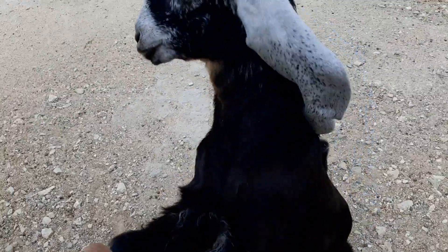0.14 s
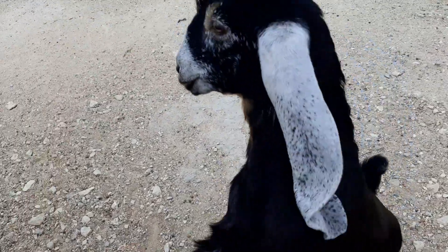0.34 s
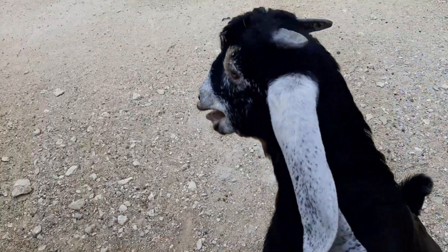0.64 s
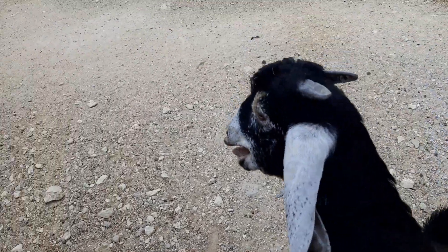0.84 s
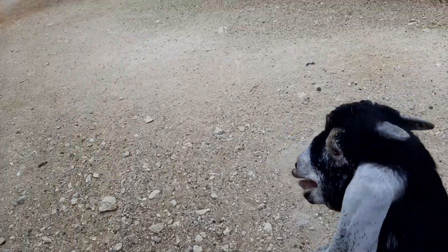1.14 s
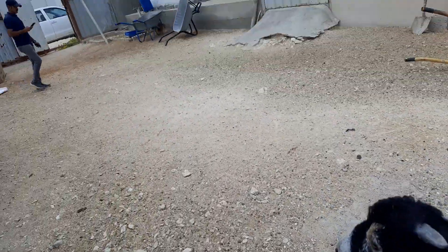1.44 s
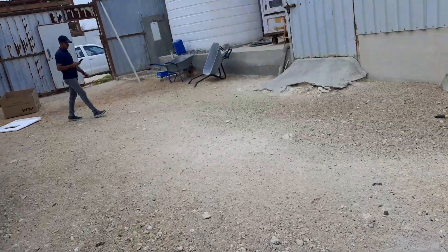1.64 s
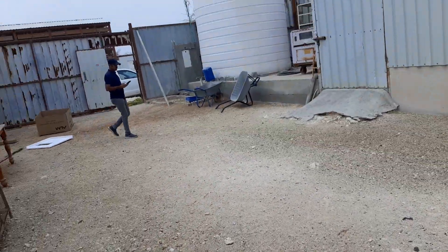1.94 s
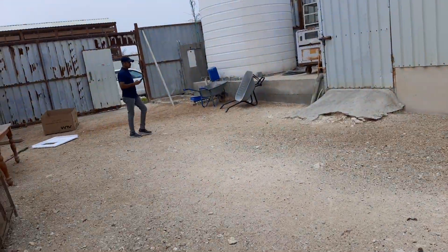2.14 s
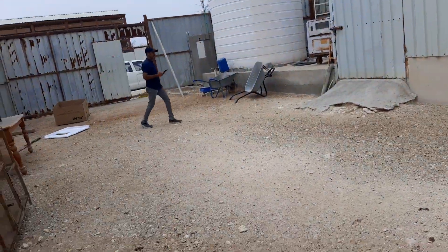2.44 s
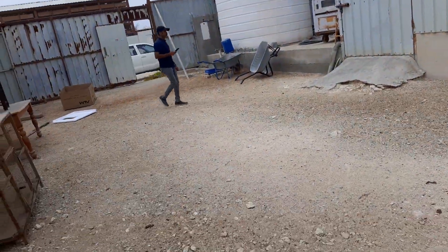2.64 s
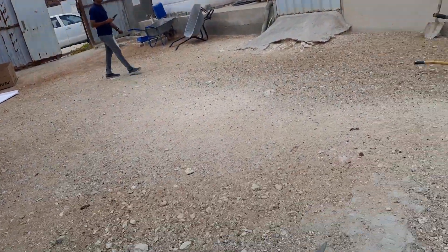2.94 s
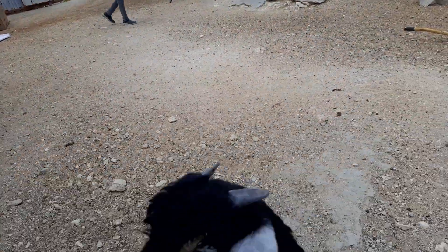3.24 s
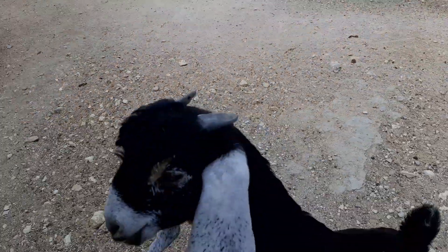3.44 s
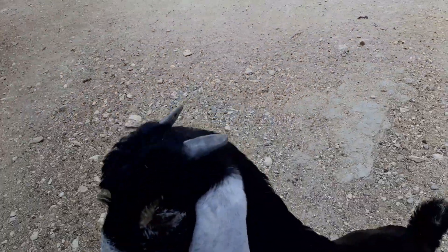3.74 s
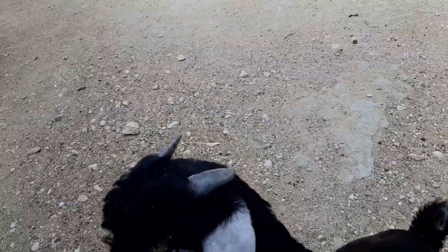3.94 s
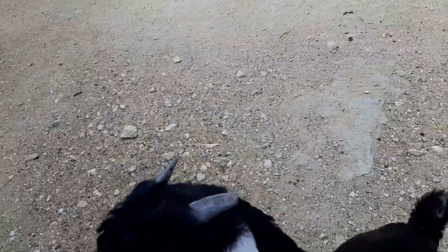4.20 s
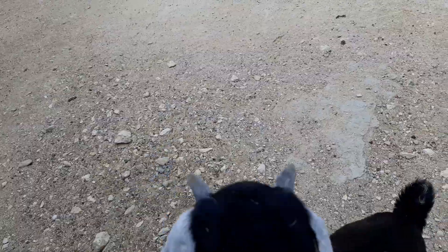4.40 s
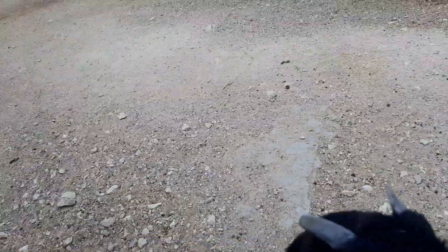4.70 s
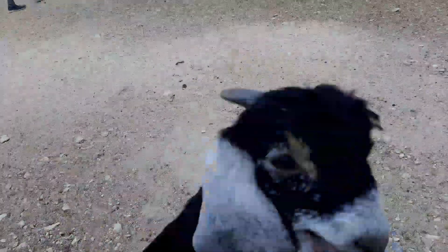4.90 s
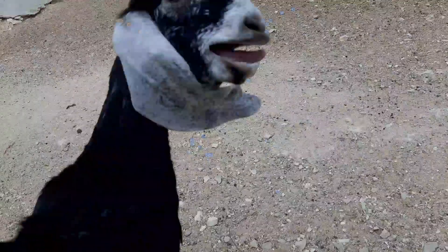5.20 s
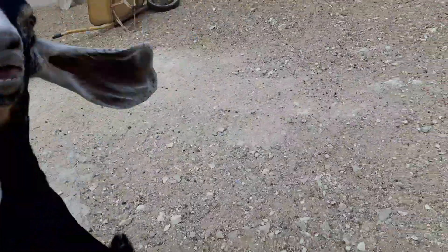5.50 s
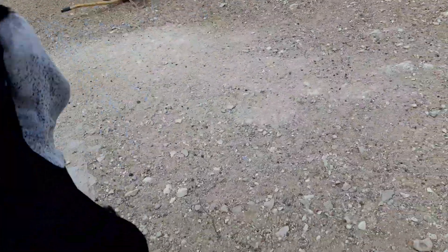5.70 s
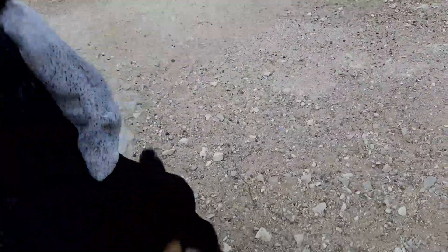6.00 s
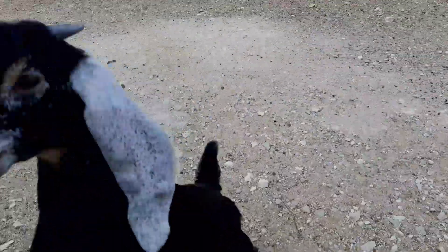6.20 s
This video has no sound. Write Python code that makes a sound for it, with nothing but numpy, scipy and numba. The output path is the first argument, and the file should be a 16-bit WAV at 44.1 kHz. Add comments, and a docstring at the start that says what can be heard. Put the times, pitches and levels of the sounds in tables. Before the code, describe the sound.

Outdoors, close stereo microphone: a low lumpy breeze at first, then three strong goat bleats, each about a second long with a gap between. The voice is reedy and nasal, fluttering about a dozen times a second, its tone shifting as the mouth opens and the tongue comes out. Short, faint reflections surround it. Afterwards only quiet air, soft hoof scuffs and dry grit remain.

```python
"""A breeze buffets the microphone ports over soft open-air hiss and a thin, far-off whine.
Then a goat bleats three times, close by, in an open gravel yard: each bleat starts through the nose, opens into
a bright tone of vocal-fold pulses shaped by mouth resonances, and quavers about eleven times a second.
Sheds send back faint echoes as delayed copies, and the yard scatters the rest as a decaying noise tail.
After the last bleat come dull hoof scuffs and dry ticks of grit, both bursts of filtered noise."""
import sys
import numpy as np
from scipy import signal
from scipy.fft import rfft, irfft, next_fast_len
from scipy.io import wavfile
from scipy.ndimage import uniform_filter1d, minimum_filter1d, map_coordinates
from numba import njit

SR = 44100
rng = np.random.default_rng(int(sys.argv[2]) if len(sys.argv) > 2 else 0)


def master(y):
    """Save y as 16-bit WAV."""
    cut = np.clip(np.atleast_2d(y).T, -1, 1)
    pcm = np.round(cut * 32767)  # scale
    wavfile.write(sys.argv[1], SR, pcm.astype(np.int16))


N = 280025
TIME = np.arange(N) / SR
CUTOFF_HZ = 15800

# breeze on the ports, before its trim and lean: (t/s, level/dB)
BREEZE_LEVEL = [(0.0, -37), (0.1, -41.5), (0.19, -34), (0.25, -45), (0.3, -34.5), (0.55, -36.5),
                (0.65, -59), (0.99, -57), (1.98, -78.5), (2.14, -56), (2.65, -50), (3.0, -58), (4.08, -55),
                (4.23, -40.5), (4.35, -54.5), (5.69, -58.5), (5.77, -51), (6.35, -53)]
# single gusts, before the lean: (t/s, peak level/dB, length/s at half height)
GUSTS = [(0.191, -36, 0.013), (5.495, -46, 0.031)]
# relative colour of the rumble: (f/Hz, level/dB per Hz)
BUFFET_COLOUR = [(15, -46.5), (25, -24.5), (75, -2.5), (113, -2), (219, -14.5), (368, -13.5), (551, -32),
                 (911, -32.5), (1200, -43), (1560, -76.5), (2640, -120)]
# side that the breeze comes from: (t/s, left-right level/dB)
BREEZE_SIDE = [(.4, -3), (.7, 6), (3.8, 4.5), (5.6, -7)]
# relative colour of the open-air hiss: (f/Hz, level/dB per Hz)
AIR_COLOUR = [(120, -20.5), (200, -10), (400, -4), (700, -14.5), (1000, -21), (1700, -23.5), (3300, -25.5),
              (8000, -27.5), (9500, -37.5), (15500, -49)]
# loudness of the open-air hiss: (t/s, level/dB)
AIR_LEVEL = [(0, -47), (.42, -44.5), (.6, -55.5), (1.8, -59.5), (3.7, -59), (5.6, -62), (6.35, -60.5)]
# far whine, before its wavering and fading: (f/Hz, level/dB)
WHINE = [(1642, -79), (3284, -83)]

# course of each bleat, before grunt and quaver: (t/s, pitch f/Hz, level/dB, quaver depth/Hz; below 0 is none)
BLEAT_1 = [(0.42, 244.7, -33.5, 3), (0.516, 358, -31, 6), (0.542, 427.6, -9, 48.5), (0.661, 454.4, -9, 48),
           (0.776, 469, -10, 12.5), (0.955, 484.6, -8.5, 48.5), (1.174, 477, -13.5, 62.5),
           (1.371, 443.6, -19, 81.5), (1.47, 230, -42, 1.5)]
BLEAT_2 = [(2.37, 286, -43.5, 6.5), (2.454, 399, -18, 16), (2.488, 449.5, -12, 13), (2.655, 483.3, -9, 27),
           (2.775, 479, -12, 9.5), (2.949, 485, -10.5, 41.5), (3.151, 470.8, -13.5, 19.5),
           (3.245, 331.4, -27.5, 12), (3.285, 211, -30, -2.5)]
BLEAT_3 = [(3.974, 258.5, -52.5, 1), (4.053, 354.3, -43.5, 0), (4.081, 436.6, -13, 71.5),
           (4.336, 492.5, -4.5, 44.5), (4.44, 473.3, -11.5, 30.5), (4.542, 480.6, -9.5, 34.5),
           (4.66, 475.9, -12.5, 6.5), (4.826, 485.8, -11, 5), (4.976, 481.3, -8.5, 12),
           (5.175, 465.6, -14.5, 4), (5.314, 412.7, -22, 7), (5.369, 239, -32.5, -1)]
# delivery of each bleat: (t/s of an early catch, quaver f/Hz at that catch, slowing/Hz per s,
# grunt centre t/s, grunt lift level/dB, opening rasp 0-1)
DELIVERY = [(.603, 12.91, 4.64, .46, 17.5, 0), (2.531, 13.21, 4.27, 2.405, 2, .03),
            (4.137, 11.53, .96, 4.003, 11.5, .15)]
CATCH_DB_PER_HZ = 0.17   # loudness lost as the pitch sags in a catch
GRUNT_S, GRUNT_RISE_HZ = .074, 44.78   # length and pitch rise of the nasal grunt that starts a bleat
ATTACK_S, RELEASE_S = 0.016, 0.034
# hoarseness 0-1: of the clear voice, per Hz of sag, when the voice is low, as it breaks into the bleat
ROUGH_CLEAR, ROUGH_PER_HZ, ROUGH_LOW, ROUGH_BREAK = .06, .002, .15, .22
LOW_HZ, LOW_RANGE_HZ = 400, 100   # low-voice hoarseness starts below this pitch and is full this far under it
BREAK_AFTER_S, BREAK_S = .065, .06   # hoarse break: centre after the grunt, length
RASP_AFTER_S, RASP_S = .19, .6   # opening rasp: centre after the grunt, length
# rush of air through the folds, strongest in the treble: (f/Hz, level/dB)
RUSH_COLOUR = [(600, -10), (2400, -2), (5000, 2.5), (10000, 17.5)]
# movement of the mouth: (t/s, jaw 0 shut - 1 parted - 2 wide and no wider, tongue out 0-1)
MOUTH = [(.538, 0.17, 0.48), (.553, 1.5, 0), (.7, 2.23, 0.1), (1.0, 1.66, 0), (1.28, 1.53, 0),
         (1.42, 0.88, 0), (2.412, 0.018, 0), (2.441, 1.31, 0.34), (2.62, 1.24, 0.55), (2.76, 1.33, 0.6),
         (2.88, 1.48, 0.35), (3.14, 1.53, 0.26), (3.25, 0.9, 0), (4.043, 0.24, 0.26), (4.082, 1.01, 0.24),
         (4.35, .98, 0.54), (4.53, 1.29, 0.96), (4.74, 1.18, 0.95), (4.88, 1.76, 0.6), (5.04, 1.505, 0.8),
         (5.2, 1.59, 0.73), (5.33, 1.22, 0)]
# resonances with the jaw shut, parted and wide: (nose level/dB, first f/Hz, level/dB, second f/Hz, level/dB,
# third f/Hz, level/dB, fourth f/Hz, level/dB, fifth level/dB, brightness level/dB)
JAW_SHAPES = [(17, 950, -39.5, 1800, -7.5, 2600, -11, 4200, 11.5, -21, -20),
              (-9, 930, 9.5, 2270, 21, 3540, 16.5, 4350, 12.5, 7.5, 2.5),
              (-16.5, 690, 4.5, 2650, 2, 3306, 30, 4230, 8.5, 4, -0.5)]
# the same columns with the tongue pushed out, jaw parted and wide
TONGUE_SHAPES = [(-2.5, 760, -18, 2535, 20.6, 2850, 14.1, 4116, 9, 2.5, 3),
                 (-20.5, 1200, -2, 2341, 4.2, 4060, 8, 4140, 18, 10.5, -8)]
NOSE_HZ, FIFTH_HZ, BRIGHT_HZ = 326, 5640, 10200
# bandwidths of the nose, the five resonances and the bright top: (width/Hz)
RESONANCE_WIDTHS = [147, 203, 172, 391, 300, 618, 4886]
# level added to the fifth resonance as the head swings: (t/s, level/dB)
TREBLE = [(.6, -2.5), (.78, -13.5), (1.0, 4.5), (1.35, 6.5), (2.5, 8.5), (2.7, 2), (2.86, -8), (3.0, 2.5),
          (3.2, 4), (4.15, 1), (4.36, -8.5), (4.53, 2.5), (4.72, -9), (5.0, 3.5), (5.3, 2)]
# steady colour of the voice, with a nasal notch: (f/Hz, level/dB)
VOICE_COLOUR = [(250, 5), (480, -3.5), (900, 4), (1350, -1.5), (1620, -12), (1900, -7), (3000, -15),
                (4300, -15.5), (5000, -16), (6800, -21.5), (8600, -32), (11500, -29), (15000, -36)]
# bands that linger in the throat and spread each pulse: (f/Hz, width/Hz)
LINGER = [(2500, 800), (4200, 1000)]
# wet hiss as the lips part on the first bleat: (t/s, peak level/dB, length/s)
LIP_HISS = (.546, -27, 0.059)
# edges of the lip hiss: (low f/Hz, high f/Hz)
LIP_BAND = (7500, 12500)

# where the head is: (t/s, left-right treble level/dB, lead of the left side/ms)
HEAD = [(.6, -7, 0.043), (1.0, 0, 0.036), (1.35, -7.5, -0.088), (2.45, -6, -0.061), (2.85, -4.5, -0.027),
        (3.2, -2, 0.11), (4.1, -5, 0.17), (4.39, 1, 0.17), (4.52, -3, .0), (4.72, -5.5, -0.068),
        (4.9, -7.5, -0.043), (5.22, -7.5, -0.031), (5.33, -2, 0.13)]
SHADE_HZ, BODY_PAN_DB = 3300, 1.47   # above this the ports are shaded unequally; left-right balance below it
# bounce off the ground: (left delay/s, right delay/s, level/dB)
GROUND = (.0031, .0034, -14)
# strength of the reflections, weaker as the goat comes closer: (t/s, level/dB)
DISTANCE = [(.5, 7.5), (1.4, 3.5), (2.5, 6), (3.25, -0.5), (4.1, 1.5), (4.5, -1), (5.1, 1.5), (5.35, -9)]
# shed reflections, before DISTANCE: (left delay/s, right delay/s, level/dB)
ECHOES = [(0.022, .031, -25.5), (0.052, .047, -26.5), (0.084, .078, -36.5)]
# relative colour of the scatter: (f/Hz, level/dB)
YARD_COLOUR = [(200, -10), (900, -6), (3000, -3), (6000, -5.5), (15000, -16.5)]
YARD_T60_S, YARD_DB = 0.36, -21.5   # decay of the scatter; its level before DISTANCE

# soft scuffs of hooves on the dirt: (t/s, peak level/dB, t60/s)
SCUFFS = [(5.688, -52, .08), (5.79, -43, .35), (6.14, -53, .15), (6.305, -47, .07)]
# relative colour of a scuff: (f/Hz, level/dB)
SCUFF_COLOUR = [(120, -16.5), (300, 6.5), (500, -4.5), (900, -15), (1500, -23), (2400, -42), (8000, -61)]
# grit ticking on the ground, before its trim: (t/s, peak level/dB)
GRIT = [(5.904, -42), (6.283, -45)]


def from_db(db):
    """Decibels to gain."""
    return 10 ** (np.asarray(db) / 20)


def rms_one(x):
    """Scale to unit power."""
    return x / np.sqrt(np.mean(x ** 2) + 1e-20)


def in_time(rows, t):
    """Each column of a curve, read at the times t."""
    s, *columns = np.transpose(rows)
    return [np.interp(t, s, c) for c in columns]


def swell(t, centre, length):
    """One smooth bump of height 1."""
    return np.cos(np.pi * np.clip((t - centre) / length, -.5, .5)) ** 2


def burst(s, db, t60):
    """Envelope that starts at once and dies away."""
    decay_db = 60 * np.clip((TIME - s) / t60, 0, 2)
    return from_db(db - decay_db) * (TIME >= s)


def drift(rate_hz, size):
    """Random wander of about unit spread: noise through a two-pole low-pass."""
    pole = np.exp(-2 * np.pi * rate_hz / SR)
    noise = rng.standard_normal(size + SR // 2)   # the extra half second lets the filter settle
    return rms_one(signal.lfilter([1], [1, -2 * pole, pole * pole], noise)[-size:])


def port_noise(shared):
    """White noise at two ports, with a shared part in both."""
    return rng.standard_normal((2, N)) + shared * rng.standard_normal(N)


def colour(x, spectrum):
    """Causal (minimum-phase) filter through the (f/Hz, level/dB) points."""
    size = 2 * next_fast_len(x.shape[-1] // 2 + SR // 20)
    hz, db = np.transpose(spectrum)
    freq = np.maximum(np.arange(size // 2 + 1) * SR / size, 1)
    cepstrum = irfft(np.log(from_db(np.interp(np.log(freq), np.log(hz), db))))
    # folding the cepstrum forward gives minimum phase
    cepstrum[1:size // 2] *= 2
    cepstrum[size // 2 + 1:] = 0
    return irfft(rfft(x, size) * np.exp(rfft(cepstrum)))[..., :x.shape[-1]]


@njit
def band_pass(x, tune, damping):
    """State-variable resonator with a moving centre, gain 1 on top."""
    out, a, b = np.zeros(len(x)), 0., 0.
    for i in range(len(x)):
        band = (a + tune[i] * (x[i] - b)) / (1 + tune[i] * (tune[i] + damping[i]))
        a, b = 2 * band - a, b + 2 * tune[i] * band
        out[i] = damping[i] * band
    return out


def resonate(x, hz, width_hz, db):
    """Lift (or hollow out) a moving band."""
    hz, gain = hz + np.zeros(len(x)), from_db(db)
    tune = np.tan(np.pi * hz / SR)
    damping = width_hz / hz / np.minimum(gain, 1)
    return x + (gain - 1) * band_pass(x, tune, damping)


def breeze(trim_db=3.5, lumpy_db=3.0, shared=.6):
    """Lumpy turbulent rumble, partly different at each port; it leans right, then left, then right again."""
    level = from_db(in_time(BREEZE_LEVEL, TIME)[0] + trim_db)
    for s, db, length in GUSTS:
        level = level + from_db(db) * swell(TIME, s, 2 * length)
    lean = from_db(np.outer([.5, -.5], in_time(BREEZE_SIDE, TIME)[0]))
    eddies = port_noise(shared) * from_db(lumpy_db * drift(25, N))
    return level * lean * rms_one(colour(eddies, BUFFET_COLOUR))


def open_air(shared=0.12):
    """Soft wide hiss: coloured noise, nearly independent at the two ports."""
    hiss = rms_one(colour(port_noise(shared), AIR_COLOUR))
    return from_db(in_time(AIR_LEVEL, TIME)[0]) * hiss


def far_whine(waver=0.0032, fading_db=3):
    """Thin sine partials that waver in pitch together and come and go."""
    turn = 2 * np.pi * np.cumsum(1 + waver * drift(30, N)) / SR
    tones = sum(np.sqrt(2) * from_db(db) * np.sin(hz * turn) for hz, db in WHINE)
    return tones * from_db(fading_db * drift(1.8, N))


def quaver(t, catch_s, rate_hz, slowing):
    """Regular catches of the voice (1 in a catch, 0 between) that slow as the breath runs out."""
    age = t - catch_s
    return np.cos(np.pi * (rate_hz * age - slowing * age ** 2 / 2)) ** 2


def hoarseness(t, pitch, sag_hz, grunt_s, rasp):
    """The folds beat unevenly in catches, at low pitch, as the grunt breaks and until the voice settles."""
    low = np.clip((LOW_HZ - pitch) / LOW_RANGE_HZ, 0, 1)
    breaking = ROUGH_BREAK * swell(t, grunt_s + BREAK_AFTER_S, BREAK_S)
    opening = breaking + rasp * swell(t, grunt_s + RASP_AFTER_S, RASP_S)
    return ROUGH_CLEAR + ROUGH_PER_HZ * sag_hz + ROUGH_LOW * low + opening


def folds(pitch, rough, jitter=0.038, shimmer=0.53, turbulence=0.33):
    """Sharp pulses of the vocal folds; when hoarse they come unevenly, each with a puff of noise."""
    size = len(pitch)
    uneven_pitch = pitch * (1 + jitter * rough * drift(74, size))
    phase = 2 * np.pi * np.cumsum(uneven_pitch) / SR
    harmonics = np.arange(1, CUTOFF_HZ // pitch.min())
    pulses = rms_one(sum(np.cos(k * phase) * (k * pitch < CUTOFF_HZ) for k in harmonics))
    uneven_level = 1 + shimmer * rough * drift(97, size)
    puffs = (1 + np.cos(phase)) * colour(rng.standard_normal(size), RUSH_COLOUR)
    return pulses * uneven_level + turbulence * rough * puffs


def mouth_shape(t):
    """The resonances glide from shape to shape as jaw and tongue move."""
    jaw, tongue = in_time(MOUTH, t)
    tongue = np.clip(tongue, 0, 1)
    shape = []
    for by_jaw, with_tongue in zip(np.transpose(JAW_SHAPES), np.transpose(TONGUE_SHAPES)):
        tongue_in = np.interp(jaw, np.arange(len(by_jaw)), by_jaw)
        tongue_out = np.interp(jaw, [1, 2], with_tongue)
        shape.append((1 - tongue) * tongue_in + tongue * tongue_out)
    return shape


def throat(x, t, slack_db, dulling=0.35):
    """Nose and mouth shape the pulses; the top dulls whenever the voice slackens."""
    nose_db, *formants, fifth_db, bright_db = mouth_shape(t)
    centres = [NOSE_HZ, *formants[::2], FIFTH_HZ, BRIGHT_HZ]
    fifth_db = fifth_db + in_time(TREBLE, t)[0]
    lifts = [nose_db, *formants[1::2], fifth_db, bright_db - dulling * slack_db]
    x = colour(x, VOICE_COLOUR)
    for hz, width_hz, db in zip(centres, RESONANCE_WIDTHS, lifts):
        x = resonate(x, hz, width_hz, db)
    for hz, width_hz in LINGER:   # all-pass: the band is delayed, its level is kept
        x = x - 2 * signal.lfilter(*signal.iirpeak(hz, hz / width_hz, fs=SR), x)
    return x


def bleat(course, catch_s, rate_hz, slowing, grunt_s, grunt_db, rasp):
    """One call: a nasal grunt, then the open voice; at every catch, pitch and loudness sag together."""
    span = (TIME >= course[0][0]) & (TIME <= course[-1][0])
    t, out = TIME[span], np.zeros(N)
    pitch, level_db, depth_hz = in_time(course, t)
    grunt = swell(t, grunt_s, GRUNT_S)
    sag_hz = np.maximum(depth_hz, 0) * quaver(t, catch_s, rate_hz, slowing)
    slack_db = CATCH_DB_PER_HZ * sag_hz
    rough = hoarseness(t, pitch, sag_hz, grunt_s, rasp)
    pulses = folds(pitch + GRUNT_RISE_HZ * grunt - sag_hz, rough)
    voice = throat(pulses, t, slack_db)
    # even out the running power, so that the course sets the loudness
    power = uniform_filter1d(uniform_filter1d(voice ** 2, size=400), size=300)
    steady = voice / np.sqrt(power + 1e-12)
    fade = np.clip(np.minimum((t - t[0]) / ATTACK_S, (t[-1] - t) / RELEASE_S), 0, 1) ** 2
    out[span] = steady * from_db(level_db + grunt_db * grunt - slack_db) * fade
    return out


def lips():
    """A short bright hiss of air between the parting lips."""
    s, db, length = LIP_HISS
    band = signal.butter(2, LIP_BAND, "band", fs=SR, output="sos")
    air = signal.sosfilt(band, rng.standard_normal(N))
    return from_db(db) * swell(TIME, s, length) * rms_one(air)


def shade(pan_db):
    """Gain of a port that is pan_db louder than the other; together they keep their power."""
    return np.sqrt(2 / (1 + from_db(-2 * pan_db)))


def delayed(x, seconds):
    """Read x a little later."""
    return np.interp(TIME - seconds, TIME, x, left=0)


def echo(x, left_s, right_s, db):
    """One reflection, with its own path to each port."""
    return from_db(db) * np.array([delayed(x, left_s), delayed(x, right_s)])


def place(x):
    """The nearer port hears the goat earlier, the shaded one less treble; the ground adds one close bounce."""
    pan_db, lead_ms = in_time(HEAD, TIME)
    lead_s = lead_ms / 1000
    body = signal.sosfiltfilt(signal.butter(4, SHADE_HZ, fs=SR, output="sos"), x)
    treble = x - body
    ports = []
    for side in (1, -1):   # left, right
        heard = body * shade(side * BODY_PAN_DB) + treble * shade(side * pan_db)
        read_at = np.arange(N) + side * lead_s * SR / 2
        ports.append(map_coordinates(heard, [read_at], order=3))
    return np.array(ports) + echo(x, *GROUND)


def yard(x):
    """Faint echoes from the sheds and diffuse scatter from gravel and fences."""
    sent = x * from_db(in_time(DISTANCE, TIME)[0])
    tail = colour(rng.standard_normal((2, SR)), YARD_COLOUR) * from_db(-60 * TIME[:SR] / YARD_T60_S)
    tail /= np.sqrt(np.sum(tail ** 2) / 2)   # unit energy per port on average
    scatter = from_db(YARD_DB) * signal.fftconvolve(sent[None], tail, axes=1)[:, :N]
    return scatter + sum(echo(sent, *row) for row in ECHOES)


def hooves(shared=1.0):
    """Dull scuffs as the goat shifts its feet: dark noise that dies away."""
    rub = rms_one(colour(port_noise(shared), SCUFF_COLOUR))
    return sum(burst(*row) for row in SCUFFS) * rub


def grit(t60=0.023, trim_db=-8, low_hz=1500):
    """Tiny dry ticks of stones: very short bursts of high-passed noise."""
    level = sum(burst(s, db + trim_db, t60) for s, db in GRIT)
    high_pass = signal.butter(2, low_hz, "high", fs=SR, output="sos")
    return level * signal.sosfilt(high_pass, rng.standard_normal((2, N)))


def scene():
    """The goat in its breezy yard."""
    surroundings = breeze() + open_air() + far_whine()
    calls = zip((BLEAT_1, BLEAT_2, BLEAT_3), DELIVERY)
    goat = sum(bleat(course, *delivery) for course, delivery in calls) + lips()
    return surroundings + place(goat) + yard(goat) + hooves() + grit()


def record(dry):
    """A fast limiter pulls down peaks above full scale, then a steep low-pass cuts the top."""
    allowed = 1 / np.maximum(np.abs(dry), 1)
    gain = uniform_filter1d(minimum_filter1d(allowed, size=301), size=301)
    low_pass = signal.ellip(12, .1, 80, CUTOFF_HZ, fs=SR, output="sos")
    return signal.sosfilt(low_pass, .98 * gain * dry)


dry = scene()
out = record(dry)
master(out)
```